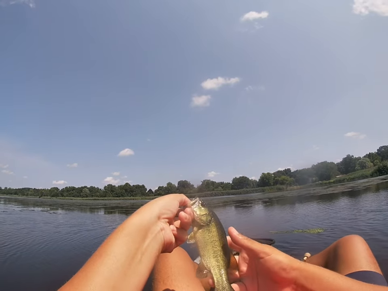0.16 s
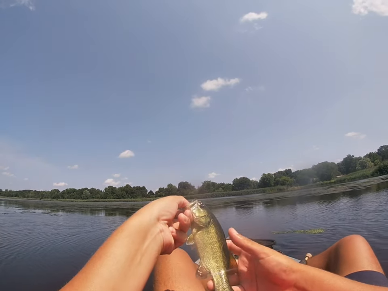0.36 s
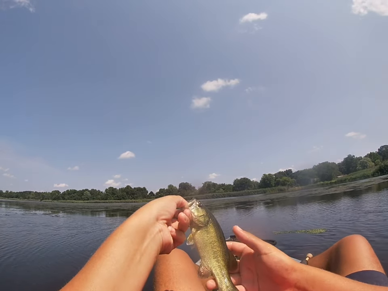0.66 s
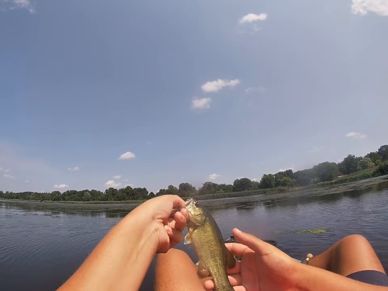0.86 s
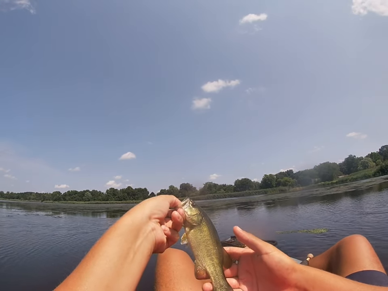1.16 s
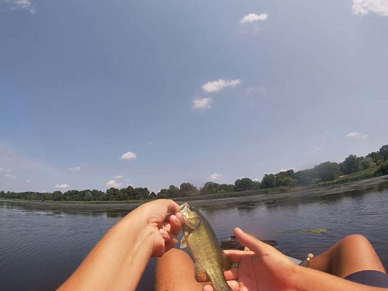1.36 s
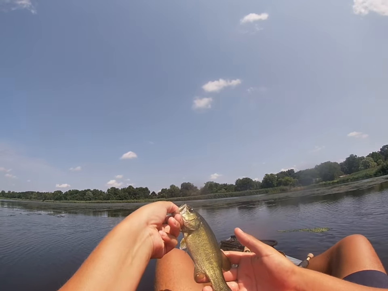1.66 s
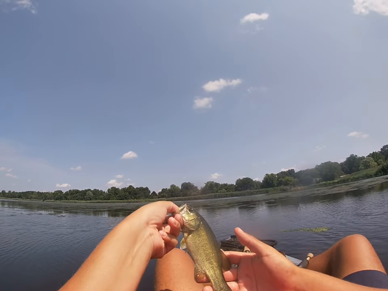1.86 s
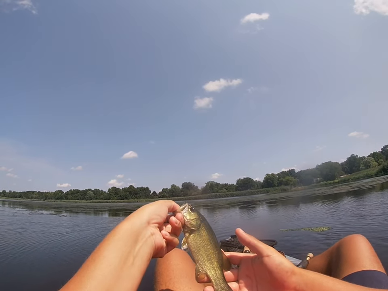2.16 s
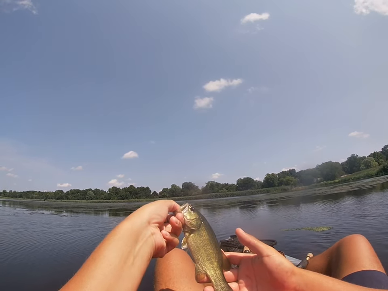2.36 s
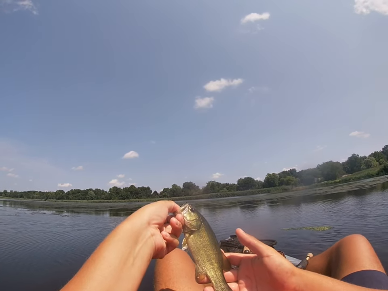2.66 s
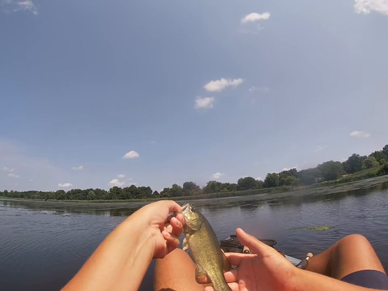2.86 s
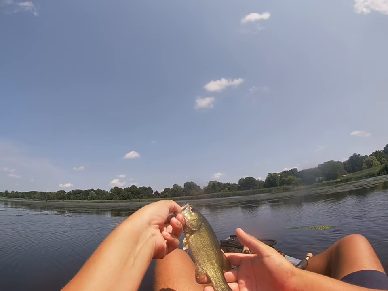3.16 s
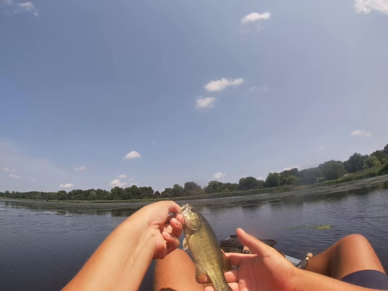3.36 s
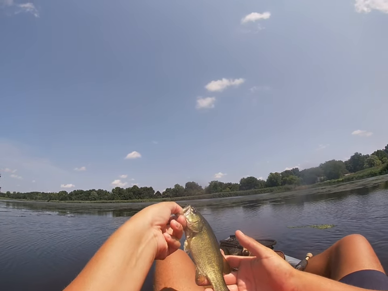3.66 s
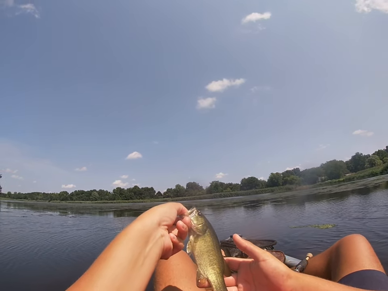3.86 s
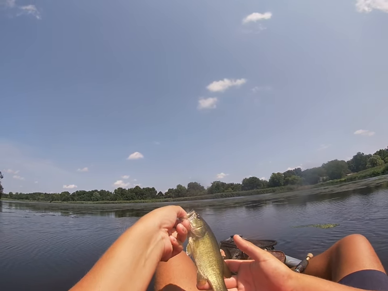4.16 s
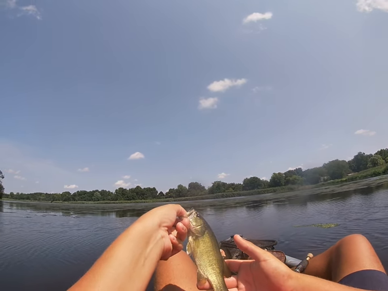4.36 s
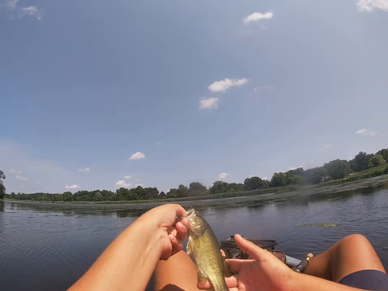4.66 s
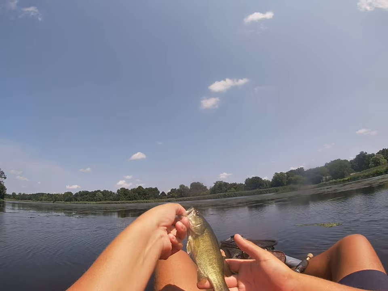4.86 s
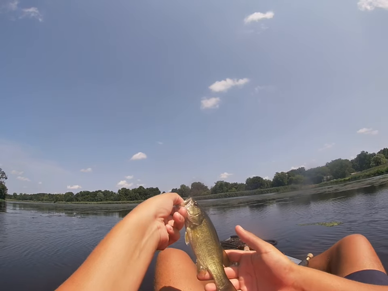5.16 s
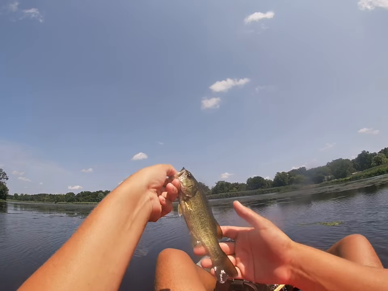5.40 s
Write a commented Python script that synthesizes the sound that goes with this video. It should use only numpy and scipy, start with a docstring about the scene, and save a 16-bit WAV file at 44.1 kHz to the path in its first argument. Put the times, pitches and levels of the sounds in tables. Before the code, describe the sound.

Outdoors on a calm lake, with the microphone in a small boat, two distant motors drone throughout. Their low, nearly fixed pitches beat against each other, fading and swelling over the water, fullest at the start and around 1, 2.4 and 4.7 seconds. Behind them lie a soft, airy hiss and a thin, high, pulsing buzz of shore insects, with faint dry ticks at about five a second.

At about 0.1 seconds the boat gives a small, close, clattering knock, while hands shift their grip with a soft rub that dies away within the first second. A light breeze rumbles on the microphone briefly at the start, then returns in gentle gusts from about 3.3 to 5.4 seconds. At about 5.4 seconds a second short, brighter knock sounds on the boat. The whole scene stays quiet and calm.

```python
"""On a calm lake, with the microphone in a small boat. Two distant motors drone at slightly different
speeds, their exhaust harmonics beating, fading and swelling over the water. Insects on the shore buzz
with their wing strokes above a soft hiss and a faint, even ticking. Close up, a light breeze brushes
the microphone, hands rustle briefly and the boat rings with two small knocks."""
import sys
import numpy as np
from scipy import signal
from scipy.fft import rfft, irfft
from scipy.io import wavfile

SR = 44100
rng = np.random.default_rng(int(sys.argv[2]) if len(sys.argv) > 2 else 0)


def wrap_up_sound(samples):
    """Save the sound to the file named by the first command line argument, as 16-bit audio."""
    columns = np.atleast_2d(samples).T
    # keep every value between -1 and 1, then stretch to whole-number steps
    tamed = np.clip(columns, -1, 1)
    steps = np.round(tamed * 32767).astype(np.int16)
    wavfile.write(sys.argv[1], SR, steps)


N = 243855
TIME = np.arange(N) / SR

# speed of each motor, the faster creeping up and the slower sagging: time_s, firing_hz
FAST_SPEED = [(0, 71.7), (.8, 71.6), (1.45, 72.4), (2, 72.05), (5.53, 72.4)]
SLOW_SPEED = [(0, 58), (1.3, 58), (2.5, 57.6), (3.8, 56.6), (4.8, 56.75), (5.53, 56)]
# how each motor fades and swells over the water: time_s, swell_db, brightness_db
FAST_FADE = [(0.0, 5, 4.5), (0.44, 1.0, 0), (0.65, -3.5, -1), (0.73, -3, -7.5), (0.94, 5, -2),
             (1.16, 5.5, -3), (1.52, -3, -2.5), (1.67, -3.5, 3), (2.32, -1, 0), (2.54, -3, 6.5),
             (2.68, -3.5, -1.5), (3.05, 1, 2.0), (3.34, -2, -3), (3.77, 1.5, 2.5), (4.06, -1, 5),
             (4.21, -2.5, 0), (4.5, 4.5, -3.5), (5.51, -2, 0.0)]
SLOW_FADE = [(0.0, 7.0, -2.5), (0.51, 3.5, 2), (0.65, -3.0, -3), (0.87, -1.5, 0), (1.02, -7, -7),
             (1.45, 2.5, -2.5), (1.96, -5, -0.5), (2.39, 6, -0.5), (2.76, 0.5, 2.5), (3.7, -4.0, 4.5),
             (3.85, 1, -5), (4.21, -9, -5.5), (4.79, 8.5, -3.5), (5.08, 1, -1.0), (5.51, 3, 2)]
# exhaust harmonics: firing_multiple, level_db, change_db_per_s, swell_share, brightness_share
FAST_HARMONICS = [(1, -48, 0, 0.88, -1.14), (2, -43.5, 0, 1.01, 0.1), (3, -48, 0, 1.25, 1.24),
                  (4, -59, -2, .5, -0.46), (5, -61.5, -1.8, 1.3, 0.22)]
SLOW_HARMONICS = [(2, -56, 0, 1.03, -1.53), (3, -48, 0, 1.12, 0.098), (4, -51.3, 0, 1, 0.75),
                  (5, -59.5, -1.38, 1.23, -0.15), (6, -60.5, -3, 1.04, -0.35)]
# nearer insects: pitch_hz, width_hz, strokes_per_s, stroke_sharpness, level_db
NEAR_INSECTS = [(7455, 130, 15.6, 3.6, -72), (7710, 420, 23, 1.2, -73), (7810, 710, 30, 8.5, -70),
                (7250, 2800, 30, 20, -71)]
# spectra of the far insects, the breeze and the shore hiss: frequency_hz, relative_db
CHORUS_SPECTRUM = [(2000, -16), (3400, 3.5), (4100, 0.5), (4750, 4), (5500, 3), (6000, 0), (6800, -0.5),
                   (7200, 8.5), (8100, 8), (8600, -9), (9600, -3), (10500, -8.5), (12700, -12),
                   (14000, -19)]
BREEZE_SPECTRUM = [(5, -20), (14, 5), (35, -7.5), (55, -8), (110, -14.5), (190, -13.5), (280, -39),
                   (500, -43.5), (1200, -78)]
HISS_SPECTRUM = [(30, 4.5), (180, 13), (300, 4), (470, 0), (570, -2.5), (760, 2), (930, -2), (1250, -3.5),
                 (1550, 0.5), (1700, -2.5), (1880, 0.3), (2100, -5), (2400, -5), (3000, -16.5), (4200, -31),
                 (9000, -44)]
# gusts at the microphone: peak_s, half_length_s, relative_db
GUSTS = [(0.025, 0.14, -41.5), (0.36, 0.4, -50.5), (0.946, .07, -48), (2.256, 0.059, -47.5),
         (3.303, 0.31, -47.5), (3.72, .24, -41), (4.06, .09, -41.5), (4.22, .06, -39), (4.62, 0.23, -41),
         (5.32, .2, -45.5)]
# blows that make up the two knocks: start_s, relative_db, centre_hz
KNOCK_BLOWS = [(0.055, -34, 1150), (0.057, -42, 1690), (0.067, -43, 1000), (0.115, -42, 790),
               (5.422, -42, 6500), (5.4243, -35, 1850)]
# resonances of the boat and of a tick: pitch_hz, t60_s, relative_db
BOAT_MODES = [(457, 0.048, 8.5), (756, 0.027, -7), (890, 0.028, 2.5), (1250, 0.026, -0.5), (1455, 0.022, 2),
              (1790, 0.018, 2), (2070, .018, -5), (2820, .012, -12), (3730, 0.015, -3), (4840, 0.009, 5),
              (5950, 0.011, 4), (6700, 0.013, 2)]
TICK_MODES = [(3500, 0.007, -3), (4530, 0.0066, -5), (4920, 0.0061, 0), (5520, 0.006, 1.5),
              (7190, 0.008, -1)]
# a quick and a slow train of ticks: start_s, period_s
TICK_TRAINS = [(.172, .2048), (.0054, .64)]


def motor(speed, fade, harmonics, wobble, flutter_db):
    """Exhaust harmonics locked to one shaft swell together, tilt dull or bright and each flutter."""
    firing_hz = curves(speed)[0] * (1 + wobble * wander(9))
    phase = 2 * np.pi * np.cumsum(firing_hz) / SR
    swell_db, bright_db = curves(fade)
    drone = 0
    for multiple, db, db_per_s, swell_share, bright_share in harmonics:
        fade_db = swell_share * swell_db + bright_share * bright_db
        level_db = db + db_per_s * TIME + fade_db + flutter_db * wander(11.8)
        drone += undb(level_db) * np.sin(multiple * phase + rng.uniform(0, 2 * np.pi))
    return np.sqrt(2) * drone


def distant_motors():
    """Two motors far across the water, whose neighbouring harmonics beat against each other."""
    fast = motor(FAST_SPEED, FAST_FADE, FAST_HARMONICS, wobble=0.0022, flutter_db=1.9)
    slow = motor(SLOW_SPEED, SLOW_FADE, SLOW_HARMONICS, wobble=0.0021, flutter_db=1.3)
    return fast + slow


def insects():
    """On the shore each wing stroke scrapes a resonance; farther insects merge into a steady chorus."""
    buzz = coloured(CHORUS_SPECTRUM) * undb(-63.5 + 0.5 * wander(23))
    for pitch_hz, width_hz, strokes_per_s, sharpness, level_db in NEAR_INSECTS:
        stroke_hz = strokes_per_s * (1 + 0.0273 * wander(2.4))
        strokes = np.cumsum(stroke_hz) / SR + rng.random()
        scrape = np.abs(np.sin(np.pi * strokes)) ** sharpness
        wing = shaped_noise(lambda hz: 1 / (1 + (2 * (hz - pitch_hz) / width_hz) ** 4))
        buzz += unit_rms(scrape * wing) * undb(level_db + 2 * wander(2.8))
    return buzz


def breeze():
    """Gusts rumble right on the microphone, with a faint breath in the lulls."""
    gusts = [undb(db) * np.exp(-((TIME - peak_s) / half_s) ** 2) for peak_s, half_s, db in GUSTS]
    lull = undb(-57)
    strength = np.sqrt(lull ** 2 + np.sum(np.square(gusts), axis=0))
    return coloured(BREEZE_SPECTRUM) * strength * undb(4.5 + 0.62 * wander(2.7))


def boat_knocks():
    """Close by, soft blows ring the boat's low modes and hard ones the high."""
    knocks = 0
    for start_s, blow_db, centre_hz in KNOCK_BLOWS:
        modes = [(hz, t60_s, db - 9 * np.log2(hz / centre_hz) ** 2) for hz, t60_s, db in BOAT_MODES]
        knocks += undb(blow_db - 4.5) * ring(start_s, modes, rise_s=0.0004)
    return knocks


def hand_rustle():
    """Hands shift their grip at the start: a soft, close rub that dies away."""
    rub = coloured([(30, -18), (100, 5), (350, 1), (700, -12.5), (1800, -12), (3500, -43)])
    return rub * undb(-47) * decay(0, t60_s=1)


def ticking(min_gap_s=0.03):
    """Faint dry ticks in two even trains, each with a short hissy tail."""
    trains = [np.arange(start_s, N / SR, period_s) for start_s, period_s in TICK_TRAINS]
    starts = np.sort(np.concatenate(trains))
    starts = starts[np.diff(starts, prepend=-1) > min_gap_s]  # two that nearly coincide sound as one
    ticks = sum(ring(start_s, TICK_MODES, rise_s=0.002) for start_s in starts)
    tails = sum(decay(start_s, t60_s=0.16) for start_s in starts)
    tail_hiss = coloured([(2000, -8), (3400, 2), (5200, 9), (7200, -3), (8500, -12)])
    return undb(-41.5) * ticks + undb(-65) * tails * tail_hiss


def shore_hiss():
    """Airy hiss from the shore swells slowly; its low and high parts flicker separately."""
    hiss = coloured(HISS_SPECTRUM) * undb(-51.5 + 0.37 * wander(0.37))
    low = signal.sosfiltfilt(signal.butter(2, 1200, fs=SR, output="sos"), hiss)
    high = hiss - low
    return low * undb(wander(7.3)) + high * undb(0.59 * wander(8.5))


def undb(db):
    """Decibels to gain."""
    return 10 ** (np.asarray(db) / 20)


def unit_rms(x):
    """Scale to rms 1."""
    return x / np.sqrt(np.mean(x ** 2))


def curves(table):
    """Each column after time_s, interpolated to one value per sample."""
    time_s, *columns = np.transpose(table)
    return [np.interp(TIME, time_s, column) for column in columns]


def shaped_noise(gain_at):
    """Noise of rms 1 whose spectrum is a given function of frequency."""
    hz = np.maximum(np.fft.rfftfreq(N, 1 / SR), 1)
    return unit_rms(irfft(rfft(rng.standard_normal(N)) * gain_at(hz), N))


def coloured(spectrum):
    """Noise of rms 1 shaped by points of frequency_hz, relative_db."""
    points_hz, points_db = np.transpose(spectrum)
    return shaped_noise(lambda hz: undb(np.interp(np.log(hz), np.log(points_hz), points_db)))


def wander(rate_hz):
    """Smooth random drift of rms 1, mostly slower than the given rate."""
    return shaped_noise(lambda hz: np.exp(-0.5 * (hz / rate_hz) ** 2))


def decay(start_s, t60_s):
    """Envelope that jumps to 1 at the start and dies away."""
    age = TIME - start_s
    return (age >= 0) * np.exp(-np.log(1000) * np.clip(age / t60_s, 0, 2))


def ring(start_s, modes, rise_s):
    """Damped modes set ringing at one moment."""
    age = TIME[:SR // 10]
    tone = 0
    for hz, t60_s, db in modes:
        tone += undb(db - 60 * age / t60_s) * np.sin(2 * np.pi * hz * age + rng.uniform(0, 2 * np.pi))
    attack = np.minimum(age / rise_s, 1)
    return np.pad(tone * attack, (int(start_s * SR), N))[:N]


def scene():
    """Everything as it reaches one microphone in the boat."""
    mix = distant_motors() + breeze() + shore_hiss() + insects() + ticking()
    return (mix + hand_rustle() + boat_knocks())[None]


def record(dry):
    """The recorder cuts the top treble steeply."""
    top_hz = 12700
    return signal.sosfilt(signal.ellip(8, 0.2, 70, top_hz, fs=SR, output="sos"), dry)


dry = scene()
out = record(dry)
wrap_up_sound(out)
```